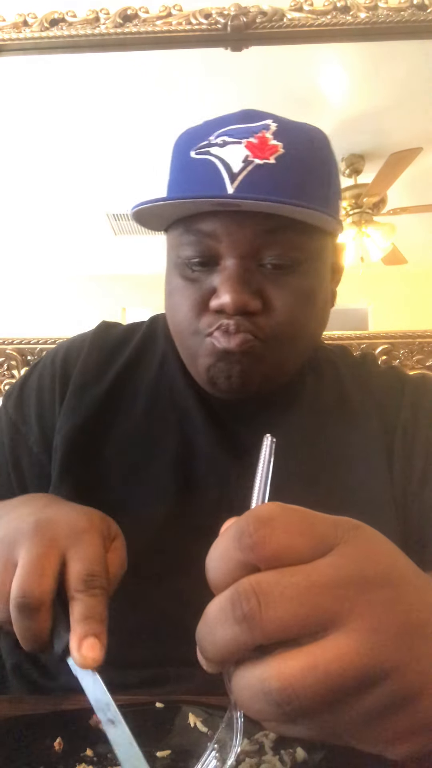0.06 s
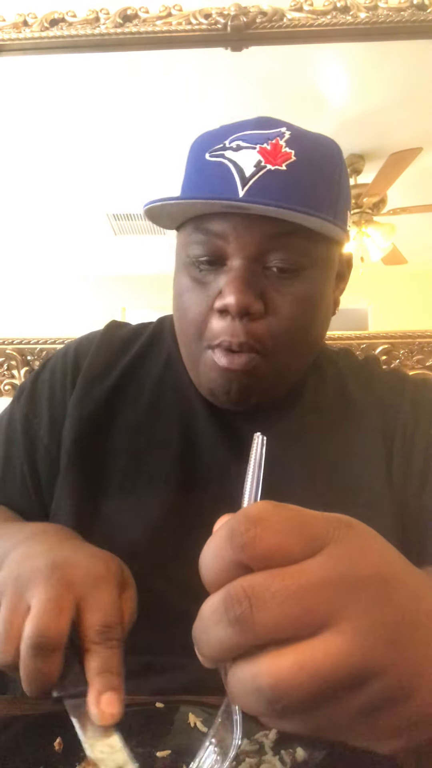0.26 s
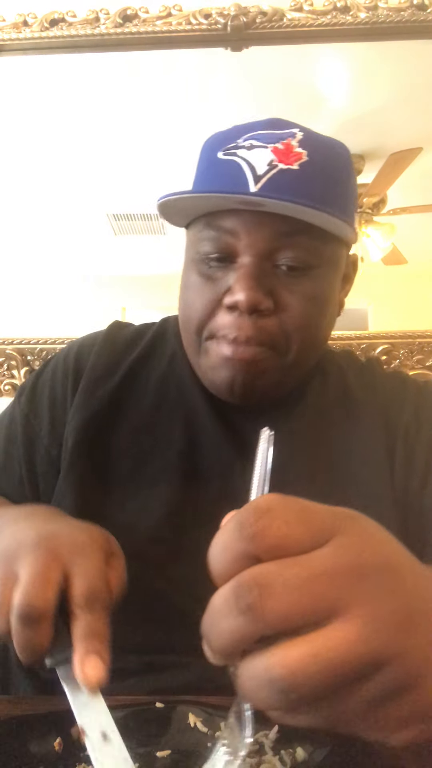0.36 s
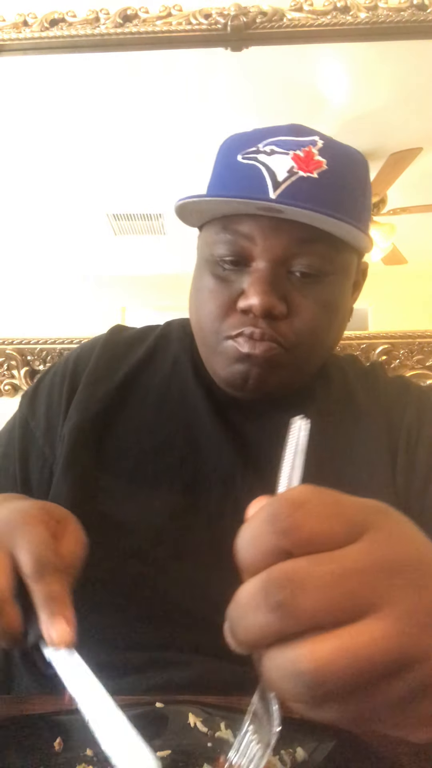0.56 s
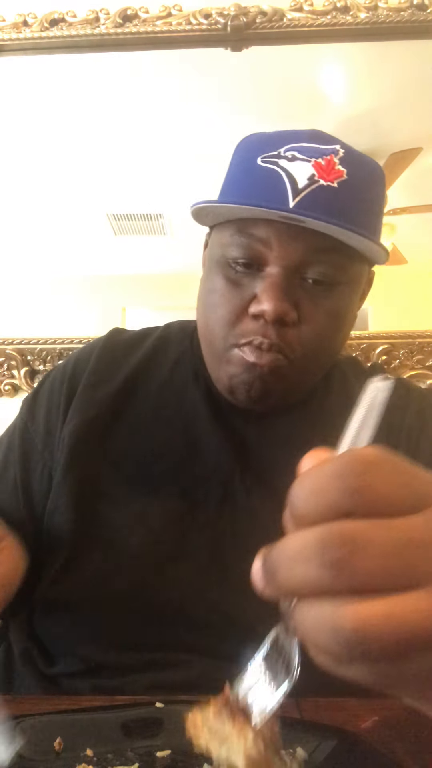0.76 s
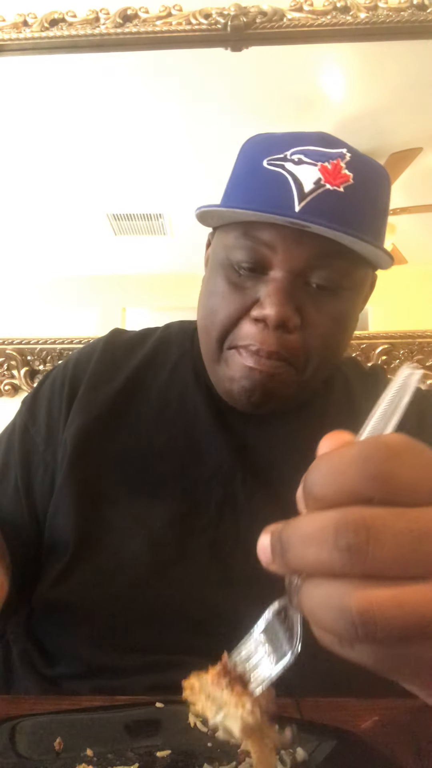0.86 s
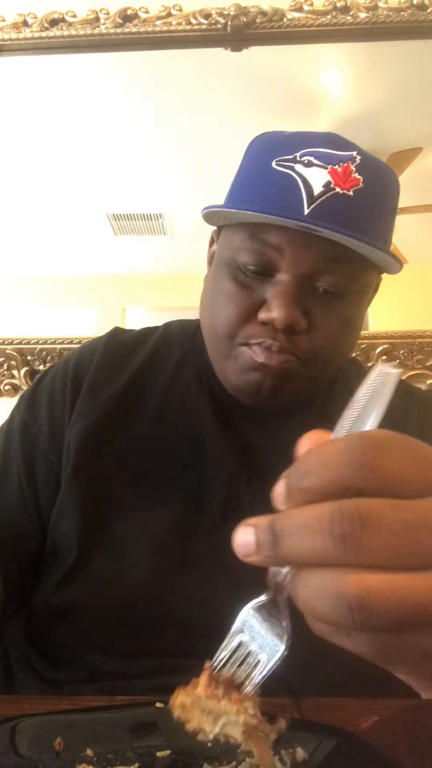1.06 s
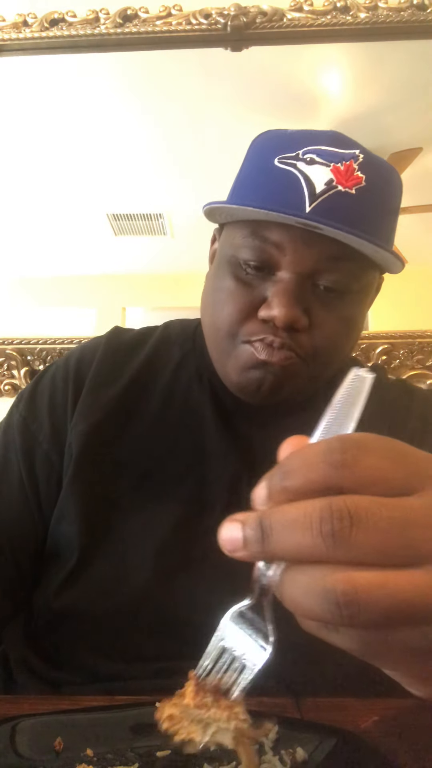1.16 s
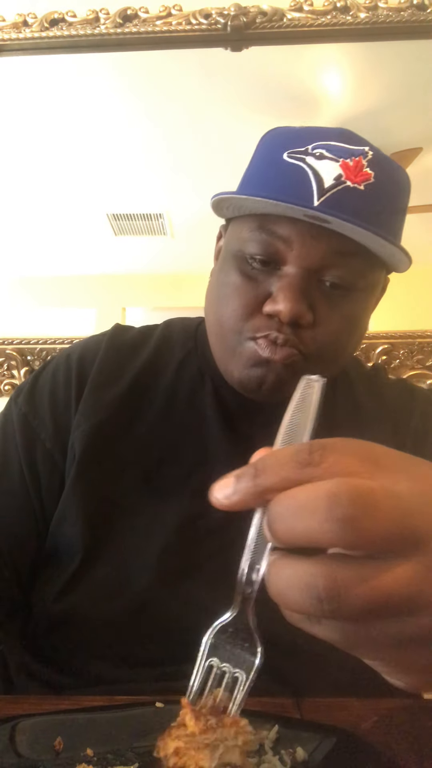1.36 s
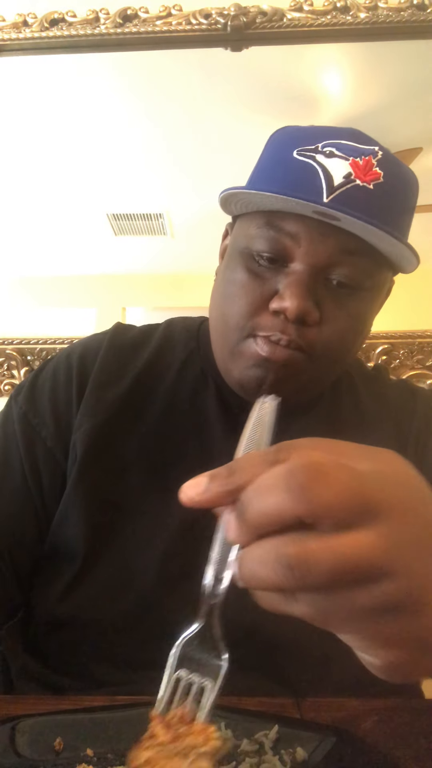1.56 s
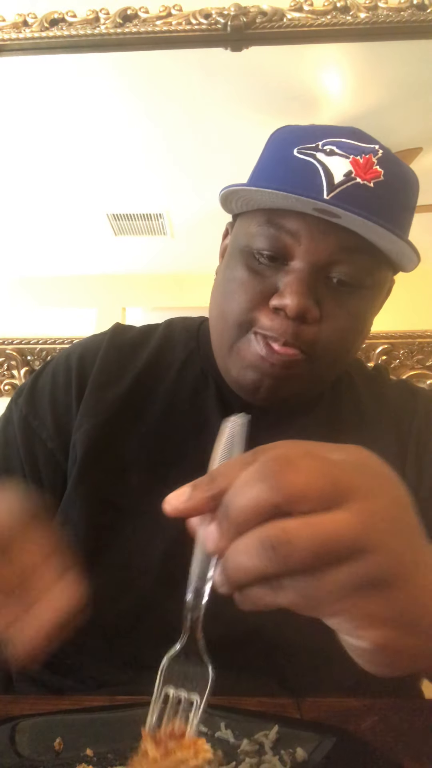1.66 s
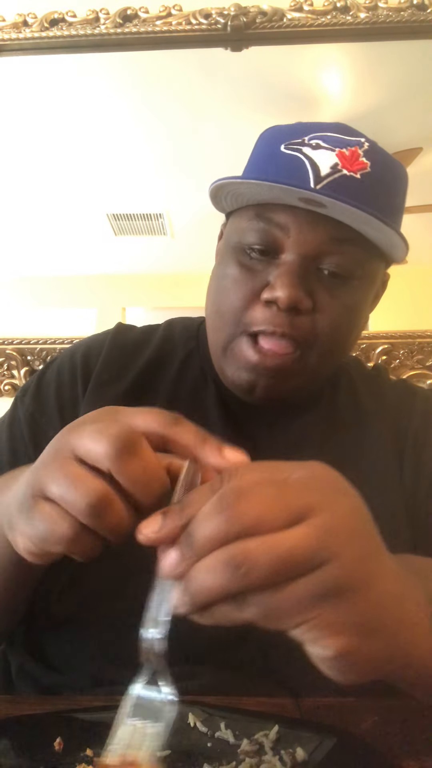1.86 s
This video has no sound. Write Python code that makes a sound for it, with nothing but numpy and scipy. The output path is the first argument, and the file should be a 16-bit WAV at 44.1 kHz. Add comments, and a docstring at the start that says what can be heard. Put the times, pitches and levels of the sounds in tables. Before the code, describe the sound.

Close cutlery sounds at an indoor table: short muffled sawing, a bright dry knife clack with a brief slide, quiet faint rubbing, a small fork clink, then a cluster of knocks on the tabletop over low room hum.

```python
"""A knife saws through food, snaps through onto the plate and slides off: stick-slip grains and short contact
bursts excite the damped modes of blade and plate. Later a fork ticks and shuffles on the plate, and something
is knocked down on the table and bounces: thuds and ticks excite the table top. A faint narrow rubbing joins in.
All is heard close, with a diffuse decaying room tail of filtered noise, over a low hum, rumble and hiss."""
import sys
import numpy as np
from scipy import signal
from scipy.fft import rfft, irfft
from scipy.io import wavfile
from scipy.ndimage import uniform_filter1d

SR = 44100
rng = np.random.default_rng(int(sys.argv[2]) if len(sys.argv) > 2 else 0)


def field_ratio(decibels):
    """Amplitude ratio for a level in dB (20 dB per decade); scalars and array-likes work."""
    return 10 ** (np.asarray(decibels, dtype=float) / 20)


def to_wav(sig):
    """Store sig (one row per channel, or 1-D mono) as 16-bit WAV at the path in sys.argv[1].

    Samples outside -1..1 are clipped; the rate is SR.
    """
    pcm = np.clip(np.atleast_2d(sig), -1, 1) * 32767
    pcm = np.round(pcm).astype(np.int16)
    wavfile.write(sys.argv[1], SR, pcm.T)  # frames by channels


N = 83790  # samples, 1.9 s
CRACK_T60_S = .013  # dense ringing after each blow of knife or fork


def level(x, db):
    """Normalisation: scale a signal to a given rms level."""
    return x * field_ratio(db) / np.sqrt(np.mean(x ** 2))


def curve(points, col):
    """Linear interpolation of a column against time, here in dB or Hz."""
    rows = np.array(points, float)
    return np.interp(np.arange(N) / SR, rows[:, 0], rows[:, col])


def band(x, lo_hz, hi_hz):
    """Band-pass filtering with second-order Butterworth skirts."""
    edges = [lo_hz, min(hi_hz, .45 * SR)]
    return signal.sosfilt(signal.butter(N=2, Wn=edges, btype="band", fs=SR, output="sos"), x)


def ring(x, modes):
    """Modal superposition: x drives a parallel bank of exponentially damped resonators."""
    total = 0
    for k, (hz, db, t60) in enumerate(modes):
        decay = np.log(1000) / (max(t60, .004) * SR)  # no mode dies in under 4 ms
        pole = np.exp(2j * np.pi * hz / SR - decay)
        sign = (-1) ** k  # neighbouring modes in opposite phase
        total = total + sign * field_ratio(db) * signal.lfilter([1], [1, -pole], x).imag
    return total


def wide(peaks):
    """Bandwidth-decay reciprocity: the wider a resonance, the shorter its ring time."""
    return [(hz, db, np.log(1000) / (np.pi * width)) for hz, width, db in peaks]


def dense(x, t60):
    """High modal density: many small damped modes merge into noise that dies in t60."""
    samples = SR // 4
    tail = rng.standard_normal(samples) * 1000 ** (-np.arange(samples) / SR / t60)
    return signal.fftconvolve(x, tail / np.sqrt(np.sum(tail ** 2)))[:N]


def grains():
    """Stick-slip friction: random clicks of either sign, a few of them much bigger."""
    grains_per_s, spread_db, biggest = 5300, 3.5, 3.5  # biggest in units of spread_db
    on = rng.random(N) < grains_per_s / SR
    sign = np.sign(rng.standard_normal(N))
    size = np.minimum(rng.exponential(size=N), biggest)
    return level(on * sign * field_ratio(spread_db * size), 0)


def blows(hits, click=.65):
    """Contact excitation: a click and a noisy rattle that swells and dies, longer contacts clicking less."""
    sharp_contact_ms = 1.2  # longer contacts lose part of their click
    x, t = np.zeros(N + 1200), np.arange(1200) / SR
    for (s, db, ms, hz), noise in zip(hits, rng.standard_normal((len(hits), 1200))):
        ms = max(ms, .05)
        rattle = noise * np.sqrt(t) * np.exp(-t * 1000 / ms)
        rattle = rattle / np.sqrt(np.sum(rattle ** 2))
        share = click * min(sharp_contact_ms / ms, 1)
        burst = rattle * (1 - share) + share * (t == 0)
        start = int(s * SR)
        x[start:start + 1200] += field_ratio(db) * band(burst, 410, hz)
    return x[:N]


def knife():
    """Forced and free vibration: sawing friction and blows excite food, blade and plate, with bright crackles."""
    # blows: t/s, relative level/dB, contact time constant/ms, upper cut-off f/Hz
    knife_hits = [(.0253, -47, 0.57, 5960), (.0498, -50.5, 0.31, 6900), (.1022, -48, 1, 6840),
                  (.2075, -35, 3.7, 7440), (.219, -33, 2.3, 5970), (.2265, -21, 6.7, 6300),
                  (.2341, -4.5, 1.4, 13000), (.2375, -18, 3.6, 12700), (.4956, -40, 0.8, 14400),
                  (.5295, -47, 0.94, 8900), (.5785, -60, 0.53, 12140), (.7048, -56, .6, 6045)]
    # modes of knife and plate struck together: f/Hz, relative level/dB, t60/s
    knife_modes = [(519, -4.5, 0.042), (1183.4, -6.5, 0.0067), (1355, 3.5, 0.025), (1634, -7.5, 0.026),
                   (1876, 3, 0.018), (2510, -5.5, .018), (2678, -6, 0.046), (3145, -3, 0.084),
                   (3730, 2, 0.03), (4270, 8, 0.011), (4530, 1.5, 0.06), (4695, 0.5, 0.012),
                   (5505, 4.5, 0.0091), (5838, -7, 0.0073), (7320, -9, 0.036), (7593, 1, 0.011),
                   (8905, -7.5, 0.038), (10140, -10.5, 0.014), (11235, -2, 0.037), (13100, -2, .03),
                   (14660, -11, .03)]
    # sawing: t/s, level of the dull part/dB, relative level of the blade/dB
    saw = [(0, -53.5, -60), (.05, -60.5, -63.5), (.054, -48, -57), (.075, -38, -58.5), (.092, -46, -55.5),
           (.1, -36.5, -59), (.13, -41, -61.5), (.159, -42, -72), (.166, -52.5, -74.5), (.2, -57, -72),
           (.215, -49, -58.5), (.232, -36.5, -31), (.26, -39.5, -37.5), (.33, -62.5, -44.5),
           (.42, -60, -55), (.5, -92, -55), (.56, -88.5, -68), (.7, -74, -75.5), (.75, -79.5, -127)]
    # resonances of food pressed on the plate: f/Hz, nominal width/Hz (ring floors it at 4 ms), relative level/dB
    sawn_peaks = [(425, 44, 1), (552, 79, 1.5), (631, 80, 2.5), (760, 80, 4), (887.5, 100, 1.5),
                  (1122, 120, 1), (1393, 60, -1), (1800, 160, -3), (2464, 110, -7.5), (3170, 33, -17.5),
                  (3780, 120, -16), (4340, 80, -13), (6260, 900, -9.5)]
    # resonances of bare plate under the sliding blade: f/Hz, width/Hz, relative level/dB
    slid_peaks = [(1463, 340, 5.5), (1756, 350, 5.5), (2750, 200, 1), (2903, 490, -7), (3850, 170, -6.5),
                  (4290, 290, 3.5), (5820, 440, -5), (7320, 300, -4), (11300, 250, -10.5), (13300, 230, -5)]
    # tiny bright crackles, the last two on the final fork tick: t/s, relative level/dB
    crackles = [(.4175, -56.5), (.4293, -52.5), (.4415, -59.5), (0.449, -59), (0.4768, -49.5), (.4895, -57),
                (0.558, -56.5), (1.8894, -46), (1.897, -52.5)]

    hits = blows(knife_hits)
    rub = band(grains() * field_ratio(curve(saw, col=2)), 700, 14000)
    dull = ring(grains(), wide(sawn_peaks))
    dull = band(band(dull, 370, 12000), 370, 12000)  # twice, for steeper skirts
    dull = level(dull, 0) * field_ratio(curve(saw, col=1))
    crackle = band(blows([(s, db, .2, 18000) for s, db in crackles]), 11500, 18000)

    struck = field_ratio(-10.0) * ring(hits, knife_modes)
    crack = field_ratio(12.5) * dense(hits, CRACK_T60_S)
    slide = field_ratio(-23.5) * ring(rub, wide(slid_peaks))
    return struck + crack + slide + field_ratio(-4.5) * rub + dull + field_ratio(16.0) * crackle


def fork():
    """Impulsive modal excitation: ticks ring the fork and crack, over a light friction shuffle."""
    # ticks: t/s, relative level/dB, contact time constant/ms, upper cut-off f/Hz
    fork_hits = [(1.286, -35, 0.88, 15000), (1.372, -51.5, 6.6, 16000), (1.383, -50.5, 4.2, 9000),
                 (1.4441, -52.5, 3, 6050), (1.455, -48.5, 4.5, 4000), (1.475, -52, 6.4, 12000),
                 (1.5179, -50, 7, 12900), (1.8667, -59, 2, 7040), (1.8895, -49, 0.71, 16700)]
    # modes of the fork on the plate: f/Hz, relative level/dB, t60/s
    fork_modes = [(556, -9, .13), (1061, -7, .17), (1490, -22, .04), (1885, -11.5, .33), (2070, -20, .04),
                  (3170, -14, .06), (3740, -16, .03), (4420, 4, .016), (5540, 0, .035), (7440, -12, .02),
                  (8250, -13, .03), (8830, -11, .04), (11700, -14, .025), (13900, -14, .03),
                  (15240, -11, .03)]
    # fork shuffling in the food: t/s, grain level before the band-pass/dB
    shuffle = [(1.28, -96.5), (1.3, -96.5), (1.36, -77.5), (1.39, -73), (1.42, -77), (1.46, -81),
               (1.52, -69), (1.56, -91.5), (1.6, -90.5)]

    hits = blows(fork_hits, click=.88)
    rub = band(grains() * field_ratio(curve(shuffle, col=1)), 500, 12000)
    return field_ratio(-7.0) * ring(hits, fork_modes) + field_ratio(12.0) * dense(hits, CRACK_T60_S) + rub


def table():
    """Impact on a resonant plate: thuds ring the table top, ticks clatter, the shifting plate rumbles it."""
    # knocks: t/s, relative thud level/dB, relative tick level/dB, tick upper cut-off f/Hz
    knocks = [(.2105, -54, -73, 3020), (1.5356, -25.5, -47, 5400), (1.6555, -29, -34, 12100),
              (1.678, -33.5, -58, 2990), (1.6964, -31, -53.5, 5210), (1.7294, -33, -45, 4900),
              (1.7604, -37, -56, 2900), (1.7813, -35, -53.5, 3950), (1.815, -46, -79, 2480)]
    # modes of the table top with the plate on it: f/Hz, relative level/dB, t60/s
    table_modes = [(111.56, -7, 0.083), (200.7, -6.5, 0.11), (228.7, -4.5, 0.088), (310, -12.5, 0.079),
                   (404, -12.5, 0.062), (458, 3.5, 0.068), (534.3, -4, 0.11), (581.2, -8.5, 0.15),
                   (675, -17.5, 0.027), (866, -2.5, 0.06), (1104, -6, .08), (1517, -7.5, 0.11),
                   (2260, -15.5, 0.036), (2670, -18.5, 0.03), (2840, -17, 0.048), (3240, -21, .03),
                   (3530, -18.5, .015), (4046, -19, 0.084), (4500, -19, 0.061), (5180, -19.5, 0.018),
                   (5500, -22, 0.035), (5970, -29.5, .04)]
    # the plate shifts on the table: t/s, level/dB
    shift = [(0, -35), (.03, -81), (.1, -52.5), (.2, -59), (.25, -43.5), (.34, -70), (.39, -49.5),
             (.49, -62.5), (.55, -95), (.7, -91), (1.25, -87.5), (1.33, -57.5), (1.41, -68), (1.46, -93),
             (1.53, -72), (1.56, -45.5), (1.65, -56.5), (1.75, -45.5), (1.83, -62), (1.9, -65)]

    thuds = np.zeros(N)
    for s, db, _, _ in knocks:
        thuds[int(s * SR)] = field_ratio(db)
    thuds = band(thuds, 110, 806)
    ticks = blows([(s, db, .4, hz) for s, _, db, hz in knocks])

    tick_clatter = band(band(dense(ticks, t60=.055), 760, 5500), 700, 6500)
    thud_clatter = band(dense(thuds, t60=.13), 520, 2500)
    clatter = field_ratio(28.5) * tick_clatter + field_ratio(28) * thud_clatter
    rumble = band(ring(band(grains(), 52, 260), table_modes), 70, 300)
    rumble = level(rumble, 0) * field_ratio(curve(shift, col=1))
    ringing = band(ring(thuds + field_ratio(9.5) * ticks, table_modes), 160, 6000)
    return field_ratio(-3) * ringing + clatter + field_ratio(9.0) * ticks + rumble


def rubbing():
    """Frequency translation: low-passed complex grains are shifted to one narrow band that drifts."""
    # faint narrow rubbing: t/s, level/dB, centre f/Hz
    rub_path = [(.63, -87.5, 2512), (.655, -64, 2532), (.69, -75.5, 2450), (.76, -75, 2420),
                (.8, -68.5, 2490), (.86, -67, 2550), (.885, -86.5, 2564), (1.08, -95.5, 2082),
                (1.12, -72.5, 2075), (1.17, -91.5, 2004), (1.48, -82, 1703), (1.497, -58.5, 1690),
                (1.515, -86.5, 1707)]
    width_hz = 380
    lowpass = signal.butter(N=2, Wn=width_hz / 2, fs=SR)
    envelope = signal.lfilter(*lowpass, grains() + 1j * grains())
    carrier = np.exp(2j * np.pi * np.cumsum(curve(rub_path, col=2)) / SR)
    return level((envelope * carrier).real, 0) * field_ratio(curve(rub_path, col=1))


def room(x):
    """Diffuse reverberation: dense echoes decay exponentially, the treble sooner than the rest."""
    level_db, low_t60_s, treble_t60_s, rise_ms = -13.5, .62, .33, .53
    t = np.arange(SR) / SR
    noise = rng.standard_normal(SR)
    low = signal.lfilter(*signal.butter(N=1, Wn=2500, fs=SR), noise)
    tail = low * 1000 ** (-t / low_t60_s) + (noise - low) * 1000 ** (-t / treble_t60_s)
    tail = tail * np.minimum(t * 1000 / rise_ms, 1)
    return signal.fftconvolve(x, tail * field_ratio(level_db) / np.sqrt(np.sum(tail ** 2)))[:N]


def floor():
    """Stationary noise shaped in frequency, its level wavering slightly, plus narrow-band noise as a hum."""
    # spectrum of room hiss and rumble: f/Hz, relative level per Hz/dB
    floor_spectrum = [(15, -37), (25, -17.5), (87, -14), (123, -2.5), (190, -15.5), (229, -12.5),
                      (531, -21), (575, -27), (887, -26.5), (1700, -31.5), (16000, -48)]
    noise_db, hum_db, hum_hz, hum_width_hz = -61.5, -73, 117, 40
    hz = np.arange(N // 2 + 1) * SR / N + 1  # 1 Hz up, to keep the logarithm finite
    rows = np.array(floor_spectrum, float)
    shape_db = np.interp(np.log(hz), np.log(rows[:, 0]), rows[:, 1])
    noise = irfft(rfft(rng.standard_normal(N)) * field_ratio(shape_db), N)
    swell = uniform_filter1d(uniform_filter1d(rng.standard_normal(N), size=2000), size=2000)
    swell_db = 0.5 * level(swell, 0)
    hum = ring(rng.standard_normal(N), wide([(hum_hz, hum_width_hz, 0)]))
    return level(noise, noise_db) * field_ratio(swell_db) + level(hum, hum_db)


def scene():
    """Linear superposition of the near sources, their reverberation and the background noise."""
    near = knife() + fork() + table() + rubbing()
    return (near + room(near) + floor())[None]


def top_cut(x):
    """Nothing passes above the cut-off."""
    return signal.sosfilt(signal.butter(12, 16780, fs=SR, output="sos"), x)


def record(dry):
    """Signal chain: the finished mix passes through one last stage."""
    return top_cut(dry)


dry = scene()
out = record(dry)
to_wav(out)
```